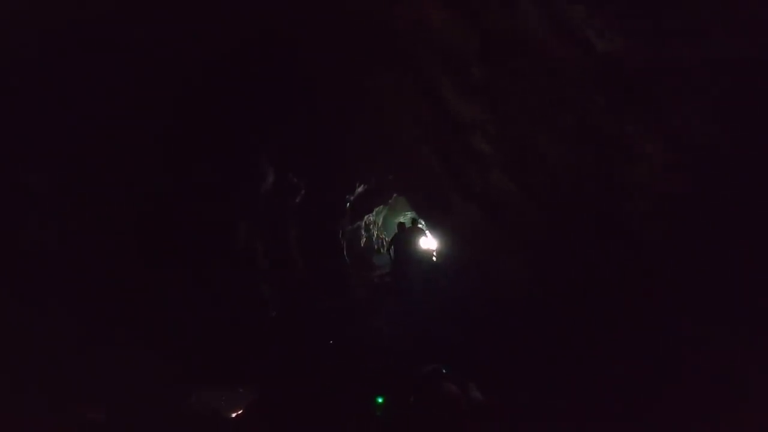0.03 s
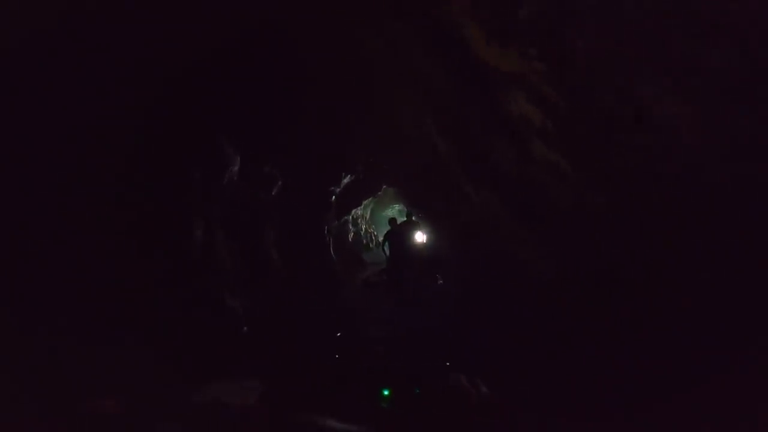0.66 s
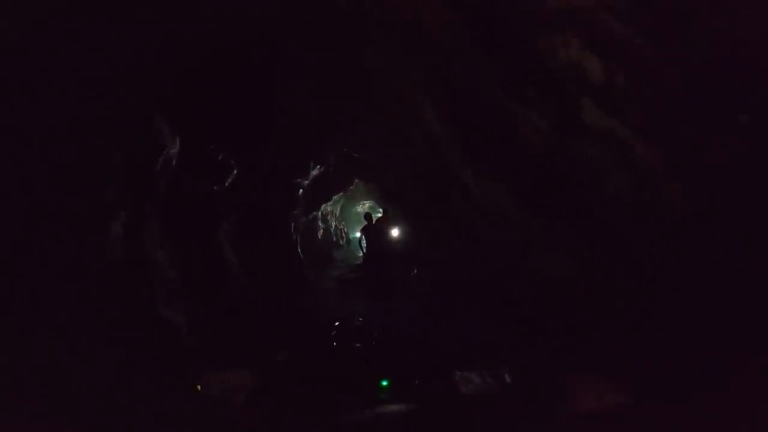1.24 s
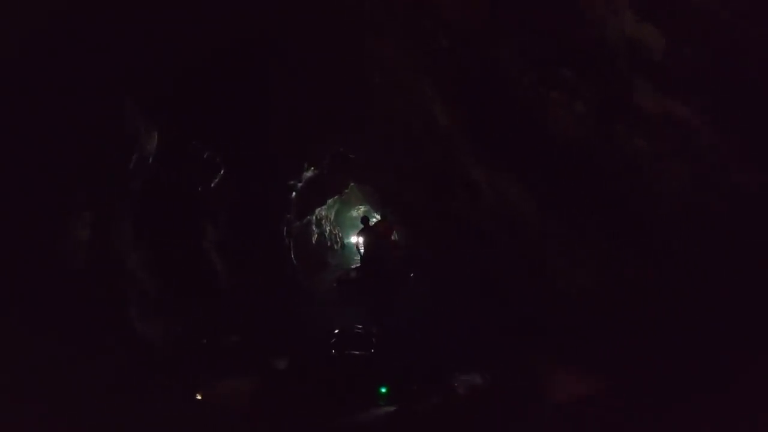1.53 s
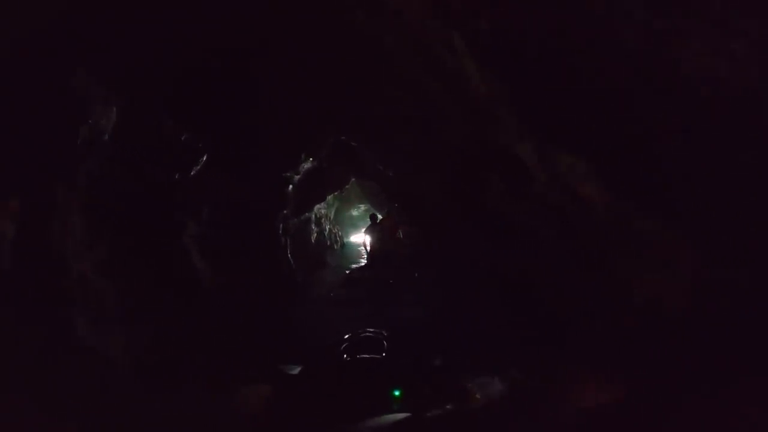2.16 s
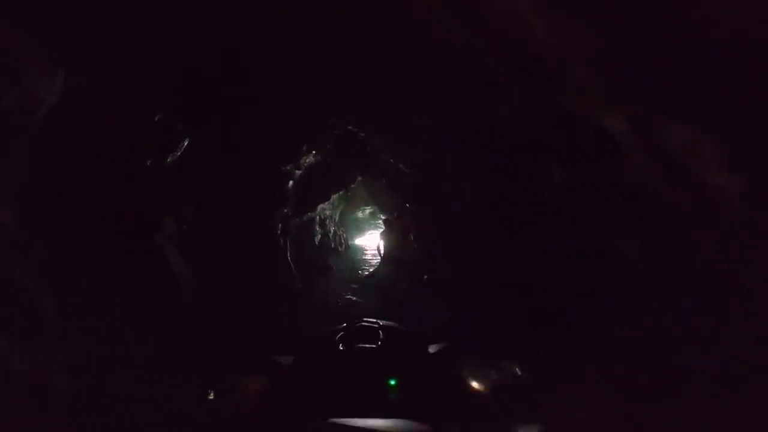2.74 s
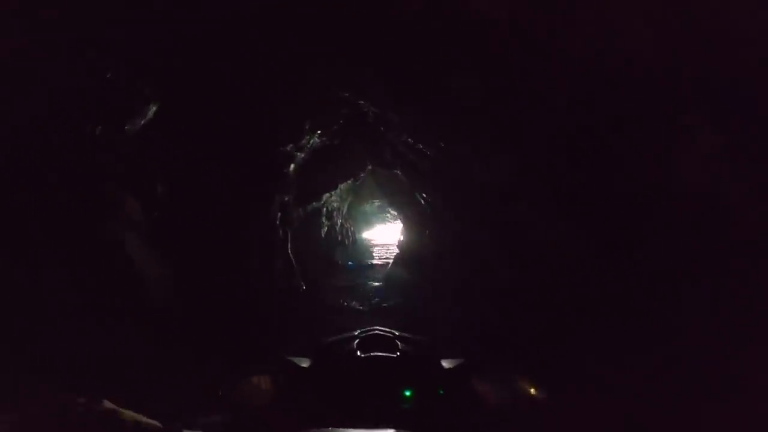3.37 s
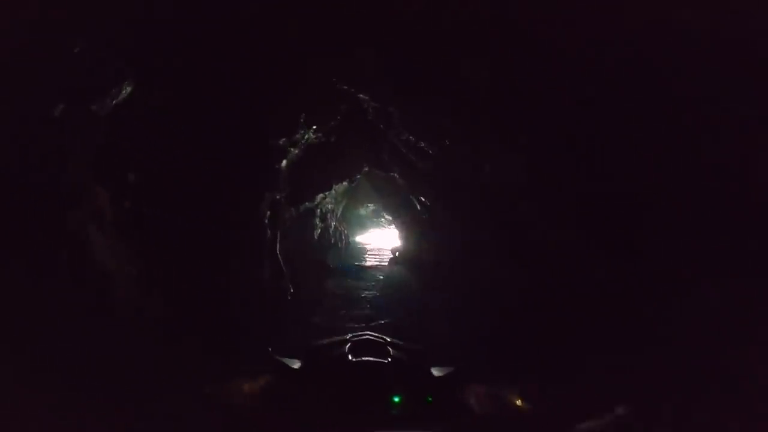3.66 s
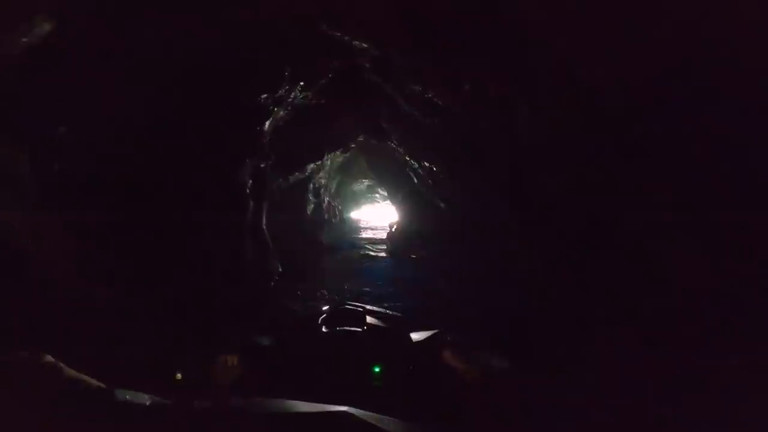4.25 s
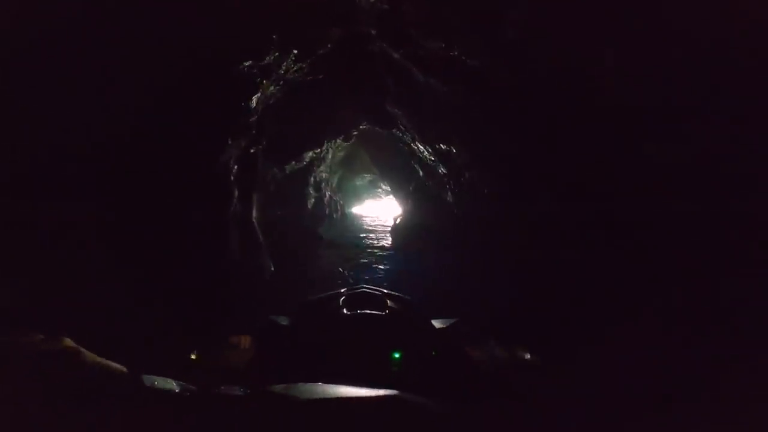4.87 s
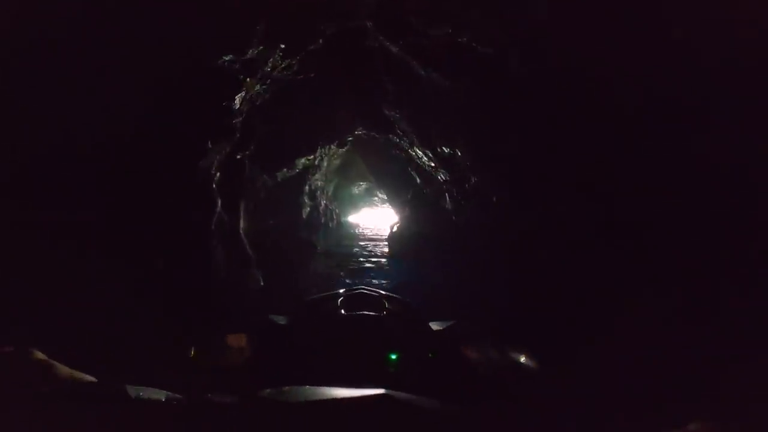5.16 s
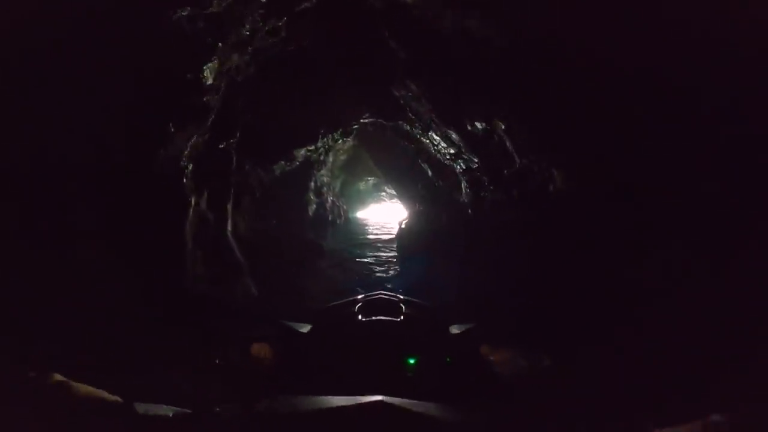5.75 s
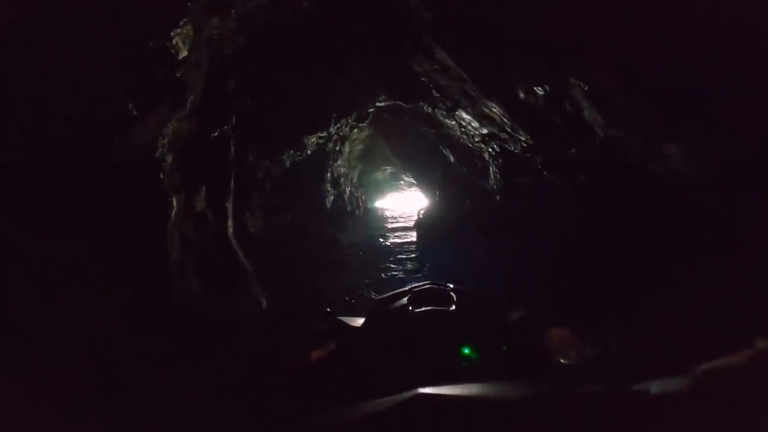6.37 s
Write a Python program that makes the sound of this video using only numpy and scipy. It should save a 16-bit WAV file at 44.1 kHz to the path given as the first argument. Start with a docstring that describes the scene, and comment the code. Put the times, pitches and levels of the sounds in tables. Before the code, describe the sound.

Heard from the saddle, a jet ski idles through a narrow sea cave, its deep boom swelling and fading while the hull shakes. A second engine drones ahead, slightly out of step. A wet exhaust puffs and gurgles and cooling water hisses throughout. The hull takes one sharp knock early on, small waves slap now and then, and a few drops tick close on the left. The rock echoes the exhaust and splashes.

```python
"""In a narrow sea cave, a jet ski idles along behind a second one, heard from the saddle.
Its three-cylinder engine booms and shakes the hull; the engine ahead drones, slightly out of step.
A wet exhaust puffs and gurgles, cooling water hisses on the surface, and small waves slap hull and rock.
The hull takes one hard knock, stray drops tick close by, and the rock echoes puffs, slaps and knock."""
import sys
import numpy as np
from scipy import signal
from scipy.fft import rfft, irfft, next_fast_len
from scipy.io import wavfile
from scipy.ndimage import uniform_filter1d, minimum_filter1d, map_coordinates

SR = 44100
rng = np.random.default_rng(int(sys.argv[2]) if len(sys.argv) > 2 else 0)


def store_wav(level_fs):
    """Save 16-bit WAV to argv[1]."""
    pcm = np.round(np.clip(np.atleast_2d(level_fs), -1, 1) * 32767)
    wavfile.write(sys.argv[1], SR, pcm.T.astype(np.int16))


N = 282681
TOP_HZ = 16000  # the highest pitch let through

# All levels are relative: each source is turned up or down as it is mixed.
# how often our own engine fires: t/s, f/Hz
OWN_FIRING = [(0, 43.55), (.65, 43.3), (1.2, 43.8), (1.8, 43.1), (2.55, 43.8), (3.1, 43.2), (3.6, 43.7),
              (4.1, 43.4), (5.4, 44.15), (5.95, 43.1), (6.41, 43.5)]
# its boom, swelling and fading along the cave: t/s, level/dB
BOOM_LEVEL = [(0, -7), (.53, -7.5), (.65, -10.5), (.88, -5.5), (1.1, -11.5), (1.4, -8), (1.6, -14),
              (1.74, -6), (1.93, -8.5), (2.06, -16.5), (2.13, -28), (2.2, -22), (2.28, -7), (2.48, -7.5),
              (2.65, -16.5), (2.74, -6), (3.35, -8), (3.58, -10.5), (3.75, -7), (4.25, -8.5), (4.62, -13),
              (4.78, -20), (4.86, -33), (4.96, -17.5), (5.24, -16.5), (5.34, -36), (5.43, -12.5),
              (5.57, -9), (5.77, -7.5), (6, -10), (6.41, -10.5)]
# the tone an octave above the boom: t/s, level/dB
OCTAVE_LEVEL = [(0, -23), (.13, -21), (.21, -38), (.32, -17), (.42, -27), (.52, -19), (.9, -35),
                (1.25, -21.5), (1.44, -29), (1.58, -15.5), (1.7, -19), (1.87, -41), (2.01, -22.5),
                (2.13, -13.5), (2.26, -30), (2.36, -16), (2.49, -33), (2.65, -16), (2.78, -24.5),
                (2.88, -17), (3.1, -25), (3.4, -40), (3.6, -24), (3.92, -18.5), (4.03, -36), (4.14, -24),
                (4.33, -33), (4.46, -26), (4.56, -34), (4.69, -20), (4.92, -51), (5.32, -47), (5.45, -25.5),
                (5.78, -23.5), (5.93, -41), (6.08, -24), (6.41, -31)]
# the low throb from the unequal cylinders: t/s, level/dB
THROB_LEVEL = [(0, -29.5), (.7, -31.5), (1.2, -24.5), (1.85, -30.5), (2.4, -27), (2.9, -30.5), (3.3, -23),
               (4.15, -31.5), (4.5, -21.5), (5.4, -20), (5.8, -29.5), (6.41, -27)]
# extra tones, as every other beat is stronger: multiple of the firing rate, level/dB
UNEVEN_BEAT_TONES = [(.5, -30), (1.5, -31), (2.5, -42)]
# the shaking of the hull: t/s, level/dB
SHAKE_LEVEL = [(0, -21.5), (.8, -14), (1.4, -16.5), (2.2, -14), (3.6, -17), (4.6, -29), (5.25, -33),
               (5.7, -18.5), (6.41, -17.5)]
# the hull's buzz, weaker than its shake: multiple of the firing rate, level/dB
BUZZ_TONES = [(.5, -20.5), (1.5, -28), (2, -15.5), (2.5, -30), (3, -25.5), (3.5, -37.5), (4, -30)]
# how often the engine ahead fires: t/s, f/Hz
AHEAD_FIRING = [(0, 44.2), (.2, 43.6), (.45, 42.8), (.7, 43.8), (1.1, 44.6), (1.6, 43.8), (2.05, 42.6),
                (2.45, 42.4), (2.8, 44.2), (3.1, 44.4), (3.5, 43.4), (3.9, 43.6), (4.35, 43.5),
                (4.55, 46.2), (4.8, 45.9), (5.1, 45.3), (5.5, 43.4), (5.75, 43.8), (6, 43.7), (6.41, 42.2)]
# its drone swelling and fading, one list for each multiple of the firing rate: t/s, level/dB
DRONE_LEVELS = { 3: [(0, -29.5), (.88, -34.5), (1.05, -21.5), (1.4, -21), (1.58, -34), (2.05, -33),
                (2.19, -16.5), (2.34, -30), (2.7, -27), (3.08, -23), (3.3, -33), (3.45, -23.5), (3.72, -20),
                (3.93, -35), (4.22, -21.5), (4.97, -21.5), (5.06, -28), (5.15, -22.5), (5.3, -21),
                (5.43, -38.5), (5.8, -30), (5.95, -23), (6.41, -24)], 4: [(0, -33), (.22, -23), (.5, -21.5),
                (.65, -32), (.85, -21.5), (1.5, -40), (2.2, -26.5), (3.5, -32.5), (4.3, -23), (4.8, -21.5),
                (5, -36), (5.6, -40), (5.85, -33), (6.2, -41), (6.41, -16.5)], 5: [(0, -21), (.13, -19.5),
                (.6, -25), (1.2, -18), (1.7, -31), (2.15, -28.5), (2.35, -21), (2.8, -26), (3.1, -32),
                (3.65, -26.5), (4.5, -36), (4.75, -22), (5.6, -25.5), (5.76, -27.5), (5.93, -20.5),
                (6.28, -20), (6.41, -21.5)], 6: [(0, -47), (1.3, -36.5), (1.55, -24.5), (2.05, -30.5),
                (2.35, -37.5), (3.5, -39), (3.85, -24.5), (4.3, -32), (4.7, -49.5), (5.75, -30.5), (6, -34),
                (6.41, -35)], 9: [(0, -21.5), (.25, -34.5), (.9, -36), (1.25, -27), (1.8, -41), (2.4, -34),
                (3.3, -38.5), (4.2, -41.5), (4.6, -29), (5.4, -41.5), (6.41, -36)], 10: [(0, -29),
                (.5, -40), (.85, -41), (2.55, -29), (2.9, -42), (4.1, -34), (4.55, -33), (5.2, -49),
                (5.95, -31), (6.41, -37)]}
# the exhaust at the waterline: t/s, level/dB
EXHAUST_LEVEL = [(0, -22), (.6, -24.5), (1.5, -22.5), (1.85, -24), (2.15, -24), (2.55, -25), (3, -25),
                 (3.7, -24), (3.97, -23.5), (4.1, -21.5), (4.35, -22.5), (4.75, -25), (5.25, -29),
                 (5.8, -25), (6.41, -26.5)]
# tone colour (how strong each pitch is) of the exhaust pipe: f/Hz, level/dB
PIPE_COLOUR = [(60, -44.5), (100, -23), (150, -8), (200, 4), (260, -2), (310, 4.5), (420, 5), (600, -13),
               (900, -12), (1500, -42), (2500, -61.5)]
# tone colour of the exhaust bubbles: f/Hz, level/dB
GURGLE_COLOUR = [(15, -25), (30, -5.5), (70, 1.5), (100, -7), (125, 0), (160, 1.5), (250, 1.5), (320, -4),
                 (430, -3.5), (600, -10), (800, -11), (1100, -19.5), (1700, -31), (3000, -70)]
# water churning behind the hull: t/s, level/dB
WAKE_LEVEL = [(0, -30.5), (1.39, -32), (1.55, -29), (2.1, -30), (2.6, -31.5), (3.02, -31), (3.16, -26),
              (3.5, -28.5), (3.77, -26), (3.98, -29), (4.07, -25.5), (4.22, -26.5), (4.33, -27), (5.2, -31),
              (5.45, -30.5), (5.65, -29), (6.41, -29.5)]
# tone colour of that churning: f/Hz, level/dB
WAKE_COLOUR = [(300, -16), (600, 6), (830, 0), (1050, -0.5), (1250, -3), (1500, 0), (1650, -7), (1850, -14),
               (2300, -17), (4000, -61)]
# cooling water spraying from the hull: t/s, level/dB
SPRAY_LEVEL = [(0, -36.5), (.65, -39.5), (1.3, -39.5), (1.7, -36), (2.0, -39.5), (2.55, -40.5),
               (3.0, -37.5), (3.2, -36), (4.25, -34), (4.7, -41), (5.25, -41.5), (5.8, -35.5), (6.41, -39)]
# tone colour of the spray: f/Hz, level/dB
SPRAY_COLOUR = [(900, -9.5), (1800, -2), (2700, -1.5), (3450, 1), (3850, -4.5), (5000, -2), (5500, -7),
                (6100, -1), (6650, 3), (7200, -4), (7900, -13.5), (9000, -19.5), (11000, -35),
                (15500, -53.5)]
# small waves slapping: t/s, level/dB, f/Hz, pitch spread (log scale), time scale/s
WAVE_SLAPS = [(.374, -24, 6700, .07, .004), (.428, -26.5, 6150, .24, .025), (.552, -31.5, 4440, .06, .008),
              (.848, -27.5, 1600, .1, .025), (1.008, -31.5, 2560, .08, .01), (1.012, -29.5, 6980, .13, .03),
              (1.025, -29, 4550, .09, .024), (1.335, -28, 6600, .13, .012), (1.47, -25.5, 6580, .13, .007),
              (1.991, -28, 5430, .1, .005), (2.207, -29, 6800, .16, .035), (2.26, -25, 1500, .08, .03),
              (2.721, -26, 2250, .13, .01), (2.724, -28, 4000, .25, .035), (2.749, -19.5, 6770, .14, .036),
              (2.88, -21, 6700, .1, .019), (2.886, -25, 3550, .15, .014), (4.462, -23.5, 1720, .08, .036),
              (5.283, -28.5, 6800, .13, .035), (5.604, -31, 4720, .1, .013), (5.62, -26.5, 1500, .08, .03)]
# tone colour of a small breaking wave: f/Hz, level/dB
SPLASH_COLOUR = [(500, -6), (1500, 0), (7000, 0), (8200, -5), (10000, -7), (15000, -19)]
# a hard knock on the hull: t/s, level/dB
HULL_KNOCKS = [(.815, -26.8)]
# tone colour of its crack: f/Hz, level/dB
CRACK_COLOUR = [(500, -40), (900, -16), (1400, -3), (2700, -2), (3500, -4), (4400, 2), (4900, -2),
                (5600, -25), (8000, -60)]
# the notes the hull rings with: f/Hz, level/dB, time to fade by 60 dB/s
RING_NOTES = [(1450, -8, .09), (1670, -8, .09), (2100, -7, .03), (2643, -6, .04), (3400, -7, .02),
              (4253, 1.5, .035), (4700, -2, .015)]
# drops ticking on the housing: t/s, level/dB
DROP_TICKS = [(.401, -42), (.432, -42), (1.321, -45), (1.47, -41), (1.767, -40), (1.79, -41), (2.206, -45),
              (2.749, -42), (2.768, -33.5), (2.881, -39), (2.92, -44), (3.362, -43), (5.249, -45),
              (5.262, -29)]
# how long the cave echoes at each pitch: f/Hz, time to fade by 60 dB/s
ECHO_FADE = [(100, 1.3), (500, 0.7), (2000, 0.18), (8000, 0.69)]


def own_engine(firings, boom_db=-.62, flutter_db=1.5):
    """The firings blend into a boom; unequal cylinders add tones around it, so it throbs."""
    angle = 2 * np.pi * firings
    low_db, shake_db = curve(THROB_LEVEL), curve(SHAKE_LEVEL)
    high_db = -26.8 + .55 * (shake_db - shake_db.mean())  # stronger while the hull shakes
    air = amp(curve(BOOM_LEVEL) + boom_db) * np.sin(angle)
    for multiple, db in (2 / 3, low_db), (4 / 3, high_db):  # the throb
        air += amp(db + flutter_db * wobble(4)) * np.sin(multiple * angle + .3 * wobble(2))
    air += amp(curve(OCTAVE_LEVEL) + flutter_db * wobble(6)) * np.sin(2 * angle + .86 * wobble(5))
    for multiple, db in UNEVEN_BEAT_TONES:
        air += amp(db + flutter_db * wobble(4.7)) * np.sin(multiple * angle + .5 * wobble(2))
    hull = amp(shake_db) * hull_shake(angle)
    return np.sqrt(2) * (air + np.array([hull, -hull]))  # the shake is opposite in the two ears


def hull_shake(angle, swing_s=1.04, in_step_at_s=.82):
    """The engine rattles the hull; the idle is unsteady, so the shake drifts in and out of step."""
    lead_rad = 1.58 - 1.4 * np.cos(2 * np.pi * (np.arange(N) / SR - in_step_at_s) / swing_s)
    buzz = sum(amp(db + 4.7 * wobble(4.6)) * np.sin(multiple * angle + .64 * wobble(4))
               for multiple, db in BUZZ_TONES)
    return np.sin(angle + lead_rad) + buzz


def engine_ahead(firings, drone_db=-3, flutter_db=2, waver_rad=.31, smear_rad=.08):
    """The cave carries a few of the other engine's tones; moving echoes make them waver."""
    drone = np.zeros(N)
    for multiple, rows in DRONE_LEVELS.items():
        smear = smear_rad * multiple * wobble(22)  # higher tones waver more
        gain = amp(curve(rows) + drone_db + flutter_db * wobble(12))
        drone += gain * np.cos(2 * np.pi * multiple * firings + waver_rad * wobble(9.1) + smear)
    return np.sqrt(2) * drone


def exhaust(firings, pipe_db=-9, gurgle_db=3, wake_db=-2, putter_db=.6):
    """Each firing puffs through the pipe and blows bubbles at the waterline, where the water churns."""
    puffs = np.diff(np.floor(firings + .014 * wobble(40))).clip(0, 1)  # one click per firing
    puffs = np.pad(puffs, (1, 0)) * amp(wobble(40))  # some louder, some softer
    pipe = coloured(cave_echo(puffs, wet_db=34.5), PIPE_COLOUR)  # heard mostly off the rock
    putter = amp(putter_db * np.cos(2 * np.pi * firings))  # the bubbling swells with each puff
    gurgle = coloured(pops(per_s=6000, spread_db=2.5) * putter, GURGLE_COLOUR)
    wake = coloured(pops(per_s=7000, spread_db=1) * putter * amp(.92 * wobble(16)), WAKE_COLOUR)
    outlet = amp(pipe_db) * pipe + amp(gurgle_db) * gurgle
    return amp(curve(EXHAUST_LEVEL)) * outlet + amp(curve(WAKE_LEVEL) + wake_db) * wake


def spray(spray_db=1, width_db=-23):
    """Cooling water lands on the surface in so many fine drops that it hisses."""
    drops = coloured(pops(per_s=13000, spread_db=2) * amp(.6 * wobble(25)), SPRAY_COLOUR)
    side = amp(width_db) * coloured(rng.standard_normal(N), SPRAY_COLOUR)  # widens the hiss
    return amp(curve(SPRAY_LEVEL) + spray_db) * np.array([drops + side, drops - side])


def wave_slaps(count=260, thinning=.9):
    """Each small wave breaks into a crackle of tiny bubbles that builds quickly and thins out."""
    slaps = np.zeros(N)
    for start, db, hz, spread, scale_s in WAVE_SLAPS:
        delay = rng.beta(1.15, 2.4, count)  # most bubbles come early
        pitch, gain = rng.standard_normal((2, count))
        starts = start + 2.9 * scale_s * delay
        gain *= np.exp(-thinning * delay)
        crackle = bubbles(starts, hz * np.exp(spread * pitch), gain, cycles=2.17, size=1200)
        slaps += amp(db) * crackle / np.abs(crackle).max()
    return filtered(cave_echo(slaps, wet_db=-10), lambda hz: amp(at_pitch(SPLASH_COLOUR, hz)))


def hull_knock(attack_s=.00056, crack_fade_s=.06):
    """A sharp blow makes the hull crack and ring briefly, and the rock answers."""
    knock = np.zeros(N)
    for start, db in HULL_KNOCKS:
        age = np.maximum(np.arange(N) / SR - start, 0)
        ring = sum(amp(level - 60 * age / fade_s) * np.sin(2 * np.pi * hz * age + .8 * wobble(400))
                   for hz, level, fade_s in RING_NOTES)
        crack = amp(-60 * age / crack_fade_s) * coloured(rng.standard_normal(N), CRACK_COLOUR)
        knock += amp(db) * (ring + crack) * (1 - np.exp(-age / attack_s))
    return cave_echo(knock, wet_db=-6)


def drop_ticks(spatter_s=.002, specks=5):
    """Single drops hit close by on the left, bright and echo-free; each spatters into weaker specks."""
    hit_s, db = np.transpose(DROP_TICKS)
    delay, pitch = rng.random((2, len(hit_s), specks))
    delay[:, 0] = 0  # the drop itself comes first
    starts = hit_s[:, None] + spatter_s * delay
    gain = amp(db[:, None] - 14 * np.sqrt(delay))
    hz = 8000 + 5000 * pitch
    return amp([[2], [-5]]) * bubbles(starts.ravel(), hz.ravel(), gain.ravel(), cycles=.5, size=64)


def cave_echo(x, wet_db, size=32768):
    """The rock adds an echo, wet_db louder than x; the bass rings longest."""
    hop = size // 2
    pieces = np.lib.stride_tricks.sliding_window_view(np.pad(x, size, mode="wrap"), size)[::hop]
    # each piece of sound gets its own tail of fading noise, so the echo changes as the craft moves
    hz, t, noise = signal.stft(rng.standard_normal((len(pieces), size)), SR, nperseg=256)
    fade = amp(-60 * t / at_pitch(ECHO_FADE, hz)[:, None])
    tails = signal.istft(noise * fade, SR, nperseg=256)[1]
    answers = signal.fftconvolve(pieces * np.hanning(size), tails, axes=1)
    index = np.arange(len(pieces))[:, None] * hop + np.arange(answers.shape[1])
    echo = np.bincount(index.ravel(), answers.ravel())[size:size + N]
    return (x + amp(wet_db) * np.std(x) * unit(echo)) / np.hypot(1, amp(wet_db))


def bubbles(starts, hz, gain, cycles, size):
    """Each bubble is a pure tone that swells, peaks after the given cycles and dies away."""
    age = np.minimum(hz, TOP_HZ)[:, None] * (np.arange(size) / SR)  # counted in cycles
    rings = gain[:, None] * np.sin(2 * np.pi * age) * age / cycles * np.exp(1 - age / cycles)
    index = (starts * SR).astype(int)[:, None] + np.arange(size)
    return np.bincount(index.ravel(), rings.ravel(), N)[:N]


def pops(per_s, spread_db):
    """Random pops of uneven size, at strength 1."""
    sizes = amp(spread_db * np.minimum(rng.exponential(size=N), 4))
    return unit((rng.random(N) < per_s / SR) * sizes * rng.choice([-1, 1], N))


def amp(db):
    """Turn decibels into a number to multiply by."""
    return 10 ** (np.asarray(db) / 20)


def unit(x):
    """Scale a sound to an average strength (rms) of 1."""
    return x / np.sqrt(np.mean(x ** 2) + 1e-20)


def at_pitch(rows, hz):
    """Look up a table at any frequency, on a log scale."""
    freqs, values = np.transpose(rows)
    return np.interp(np.log(hz + 1), np.log(freqs + 1), values)


def curve(rows):
    """Join (time, value) points with straight lines, one value per sample."""
    return np.interp(np.arange(N) / SR, *np.transpose(rows))


def wobble(per_s):
    """A smooth curve through per_s random points a second."""
    return map_coordinates(rng.standard_normal(int(N * per_s / SR) + 4), [np.arange(N) * per_s / SR])


def filtered(x, response):
    """Turn each frequency in x up or down by response(hz)."""
    size = next_fast_len(N + SR // 2)
    return irfft(rfft(x, size) * response(np.fft.rfftfreq(size, 1 / SR)), size)[..., :N]


def coloured(x, colour):
    """Give x a tone colour, at strength 1."""
    return unit(filtered(x, lambda hz: amp(at_pitch(colour, hz))))


def scene():
    """Mix engines and water; all but the hull shake and the ticking drops sits near the centre."""
    own = np.cumsum(curve(OWN_FIRING)) / SR  # firings counted so far
    ahead = np.cumsum(curve(AHEAD_FIRING)) / SR
    engines = own_engine(own) + engine_ahead(ahead) + exhaust(ahead)
    return engines + spray() + wave_slaps() + hull_knock() + drop_ticks()


def record(dry):
    """A fast limiter turns each channel down at the boom's peaks; the highest still clip a little."""
    ceiling, window = 1.005, 121  # share of full scale, samples
    needed = np.minimum(1, ceiling / (np.abs(dry) + 1e-9))
    gain = uniform_filter1d(minimum_filter1d(needed, window), window)
    soft_ends = signal.windows.tukey(N, .0005)
    return filtered(np.clip(dry * gain, -1, 1) * soft_ends, lambda hz: hz < TOP_HZ)


dry = scene()
out = record(dry)
store_wav(out)
```